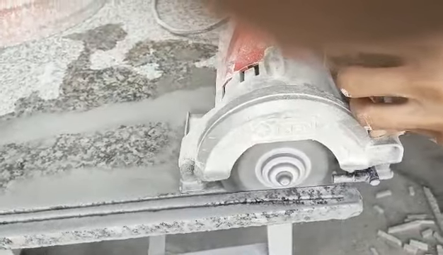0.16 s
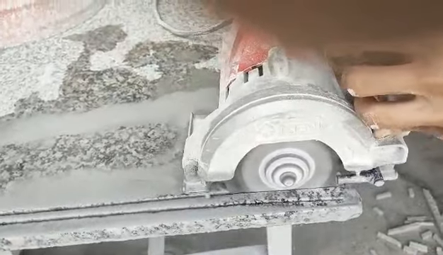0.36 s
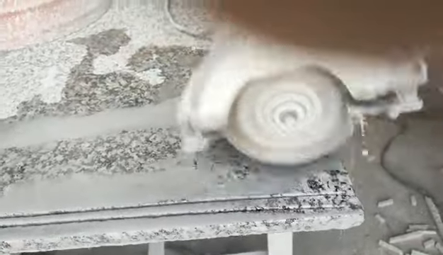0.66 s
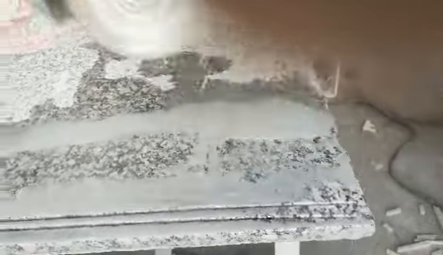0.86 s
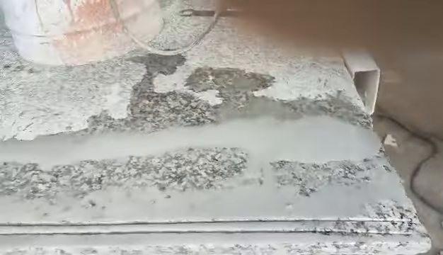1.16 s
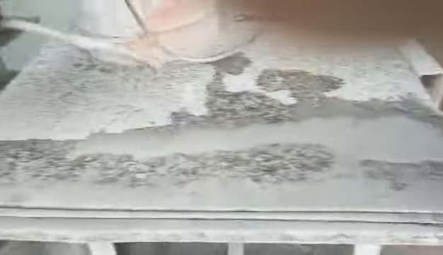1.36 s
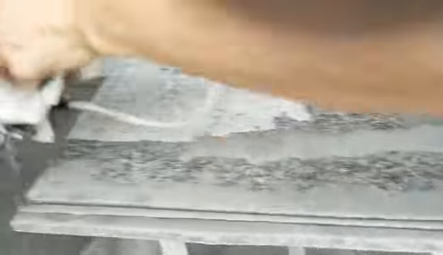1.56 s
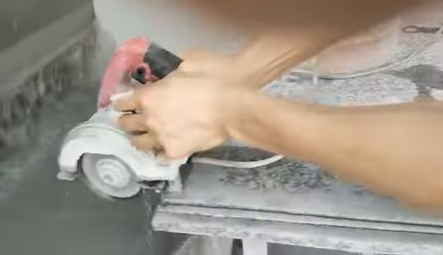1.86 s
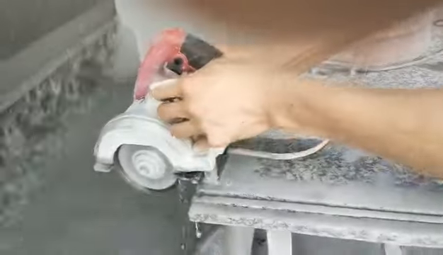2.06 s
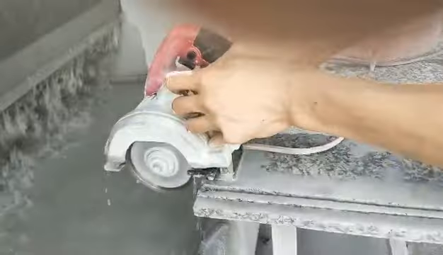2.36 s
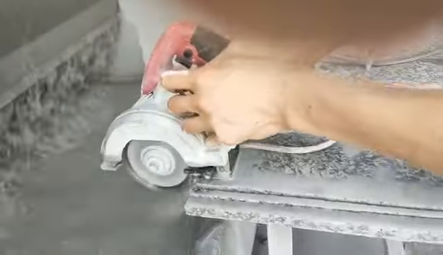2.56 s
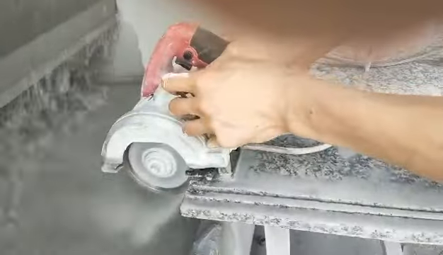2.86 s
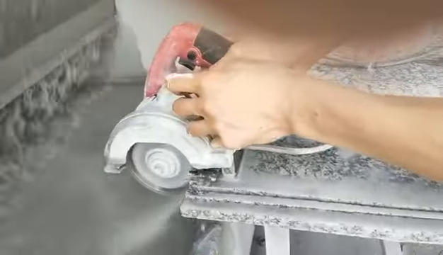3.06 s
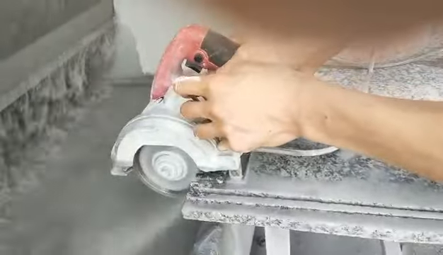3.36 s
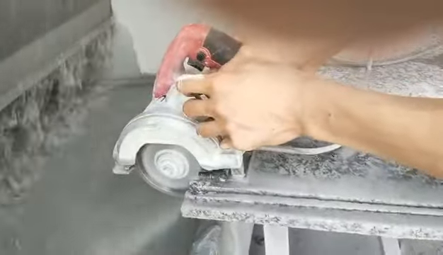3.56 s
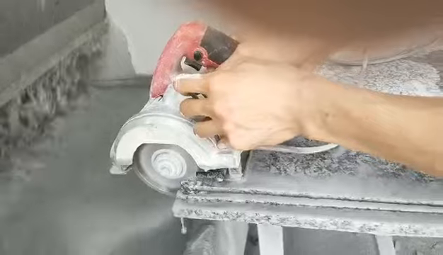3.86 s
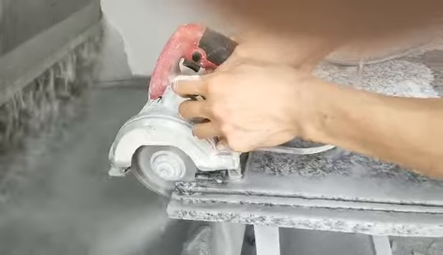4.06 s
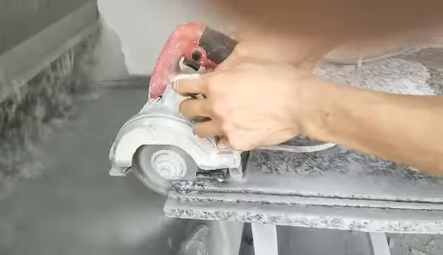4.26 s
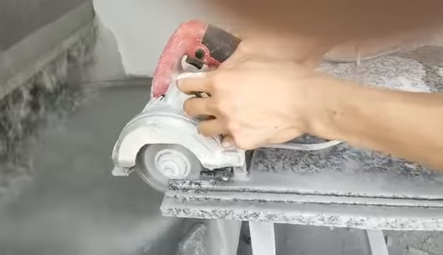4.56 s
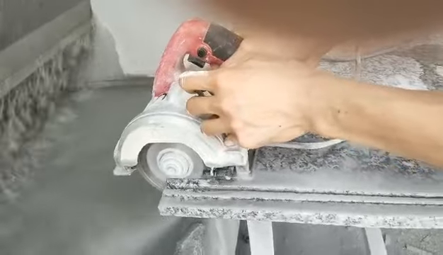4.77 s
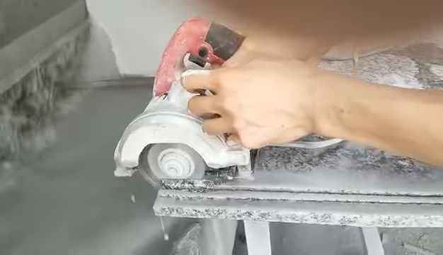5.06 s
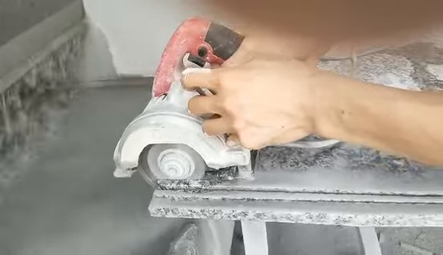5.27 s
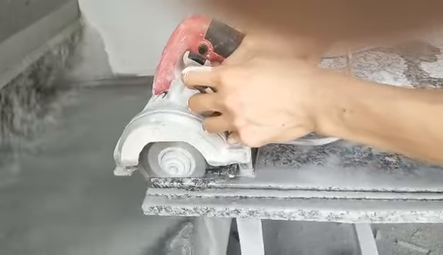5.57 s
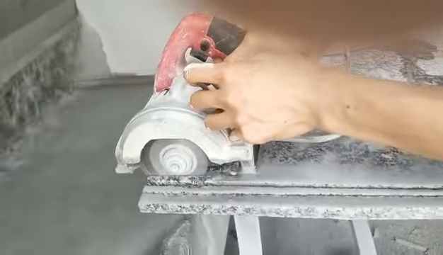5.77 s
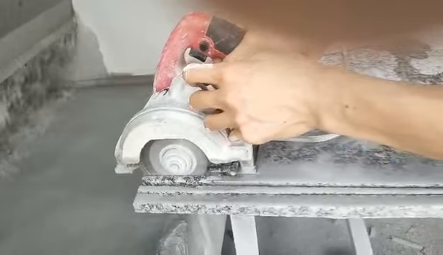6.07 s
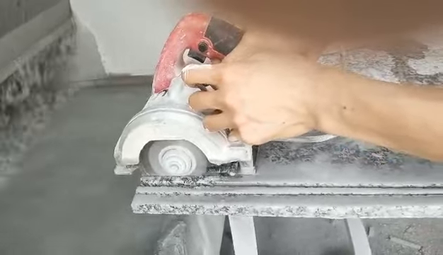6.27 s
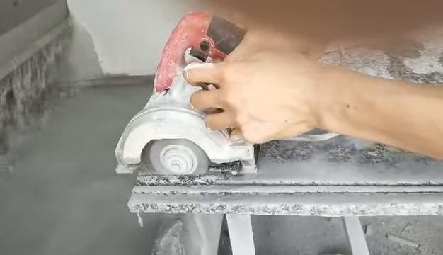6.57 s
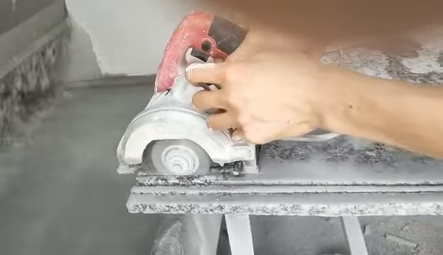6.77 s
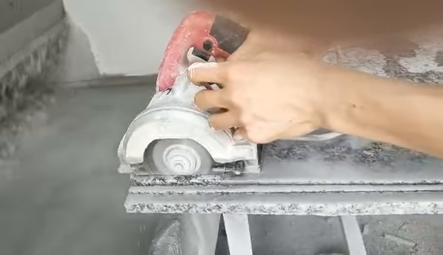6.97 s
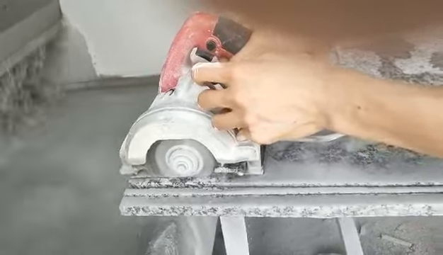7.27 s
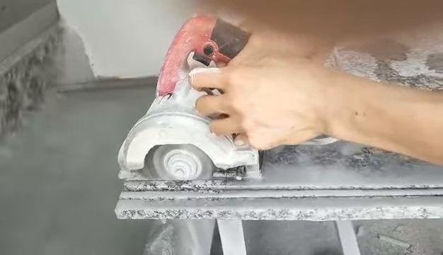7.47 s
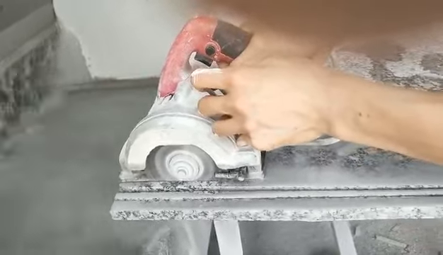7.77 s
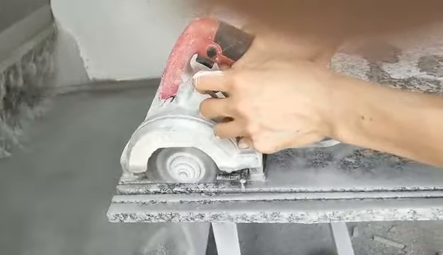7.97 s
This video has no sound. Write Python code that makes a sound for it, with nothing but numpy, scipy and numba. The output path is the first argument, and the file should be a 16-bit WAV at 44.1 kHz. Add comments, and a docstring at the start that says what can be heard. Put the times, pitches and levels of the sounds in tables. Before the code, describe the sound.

Loud gritty stone grinding with rushing slurry breaks off for an airy, whining free spin of the blade, then returns and continues steadily.

```python
"""A handheld electric cutter grinds a groove in wet granite, heard by a phone at an arm's length.
At first the diamond rim scrapes round, partly alike on each turn, and rings the steel disc; slurry rushes out.
At 0.6 s the blade is lifted and races: filtered noise makes its air hiss, a sine its rising whine.
At 2.5 s it bites again and slows, and the grinding and the slurry jet return until the end.
Throughout, the phone's gain control ducks loud grinding and brings up hiss and mains hum in the pause."""
import sys
import numpy as np
from scipy import signal
from scipy.fft import rfft, irfft, next_fast_len
from scipy.io import wavfile
from scipy.ndimage import uniform_filter1d, map_coordinates
from numba import njit

SR = 44100
rng = np.random.default_rng(int(sys.argv[2]) if len(sys.argv) > 2 else 0)


def wav_record(signal):
    """Record a signal, one row per channel, as 16-bit PCM in the file named by sys.argv[1]."""
    frames = np.transpose(np.atleast_2d(signal))
    bounded = np.clip(frames, -1, 1)
    # unit amplitude maps onto the largest positive 16-bit level
    quanta = np.round(bounded * 32767).astype(np.int16)
    wavfile.write(sys.argv[1], SR, quanta)


N = 358533
TIME = np.arange(N) / SR
GRID_HZ = np.linspace(1, SR / 2, 4096)

LOADED_HZ, FREE_HZ = 135, 198  # reference blade speeds in turns per second: cutting and running free
LIFT_S, TOUCH_S = 0.626, 2.464  # when the rim leaves the stone and when it bites again
MAINS_HZ = 99.9  # pitch of the mains hum
# which side hears more of the cut: pitch_hz, left_minus_right_db
CUT_SIDE = [(100, 1), (300, -2), (1200, -3), (2400, -2.5), (3300, 0), (7000, 0.5), (10000, 0.5),
            (13600, -4.5), (14200, 7), (14800, 9.5)]


def undb(db):
    """Turn decibels into gain."""
    return 10 ** (np.asarray(db) / 20)


def unit(x):
    """Scale to an average (rms) strength of 1."""
    return x / np.sqrt(np.mean(x ** 2))


def walk(rate):
    """Wander at random: new levels, rate times a second, are smoothed twice; the spread is near 1."""
    hold = max(int(SR / rate), 2)
    steps = np.repeat(rng.standard_normal(N // hold + 1), hold)
    smooth = uniform_filter1d(uniform_filter1d(steps, hold), hold)
    return 1.37 * smooth[:N]


def swell(centre_s, length_s):
    """A smooth rise and fall in time, reaching one at its centre."""
    return np.exp(-(2 * (TIME - centre_s) / length_s) ** 2)


def noise():
    """Unrelated noise at the two microphone ports."""
    return rng.standard_normal((2, N))


def pan(side_db):
    """Left and right gains for a level difference."""
    return undb(np.array([[.5], [-.5]]) * side_db)


def contour(points):
    """Draw a curve in decibels over all frequencies through (Hz, dB) points."""
    hz, db = np.transpose(points)
    return np.interp(np.log(GRID_HZ), np.log(hz), db)


def resonance(hz, width_hz):
    """A resonance passes one pitch best; its gain has halved half a width away."""
    return 1 / (1 + (2 * (GRID_HZ - hz) / width_hz) ** 2)


def colour(x, gains, stretch=np.ones(N)):
    """Filter each channel by its gains, scaled to rms 1; stretch slides the response up or down in time."""
    hz, s, frames = signal.stft(x, SR, nperseg=2048)
    where = hz[:, None] / np.interp(s, TIME, stretch)
    moving = np.array([np.interp(where, GRID_HZ, g) for g in gains])
    return unit(signal.istft(frames * moving, SR)[1][:, :N])


def thicket(x, depth_db, spacing_hz, life_s):
    """Many close resonances swell and fade as the tool moves, a little differently at each port."""
    hz, s, frames = signal.stft(x, SR, nperseg=2048)
    place = np.meshgrid(hz / spacing_hz, s / life_s, indexing="ij")
    both, left, right = (map_coordinates(rng.standard_normal(size=(600, 200)), place, order=2, mode="mirror")
                         for _ in range(3))
    ripple_db = depth_db * np.tanh(both + np.array([left, right]) / 2)
    return unit(signal.istft(frames * undb(ripple_db), SR)[1][:, :N])


def blade_speed():
    """The blade races when lifted and sags as the hand feeds it in; its spinning mass rounds each change."""
    # speed before rounding: time_s, turns_per_second_hz
    speed_points = [(0, 129), (.3, 134.5), (.62, 157), (1.08, 187), (1.35, 195.5), (1.85, 202),
                    (2.47, 206.8), (2.65, 203.4), (2.85, 186.8), (3.2, 161.8), (3.45, 150.4), (4, 139.4),
                    (4.25, 136.2), (4.45, 136.8), (4.68, 134.4), (5.2, 137.7), (5.5, 133.2), (5.92, 130.2),
                    (6.38, 152.9), (6.6, 142), (6.9, 139.7), (7.3, 128.7), (7.42, 129.4), (7.55, 139.7),
                    (7.75, 132.8), (8.13, 132.1)]
    return uniform_filter1d(np.interp(TIME, *np.transpose(speed_points)), size=2048, mode="nearest")


def on_stone(fade_s, bite_s):
    """One while the rim cuts, dying away after the lift and returning with the next bite."""
    fading = np.exp(-np.maximum(TIME - LIFT_S, 0) / fade_s)
    biting = np.clip((TIME - TOUCH_S) / bite_s, 0, 1)
    return fading + biting


def cut_levels(speed_hz):
    """A light, fast cut grinds louder with less fine grit; jolts briefly upset the balance."""
    # the rim catches or skips: centre_s, length_s, added grinding_db, added jet_db, added grit_db
    jolts = [(.08, 0.8, 2.5, 3, 4), (0.53, 0.043, -3.5, -8.5, -3), (0.594, 0.051, -9, 0, 3),
             (2.52, 0.075, 0, 1.5, 9), (2.577, 0.13, 3.5, -1, 1.5), (6.03, 0.2, 0, 1.5, 2.5),
             (6.517, 0.048, 3.5, 4, 1), (6.733, 0.32, 3.5, 3, 4), (6.913, 0.07, -0.5, -3, -2),
             (7.35, 0.35, 0, 0, 0)]
    light = (speed_hz - LOADED_HZ) / 69  # 1 at 69 turns per second above loaded speed
    grind_db = -17 + 1 * light
    jet_db = -17  # the same for light and deep cuts
    grit_db = -26 - 1 * light
    for centre_s, length_s, more_grind_db, more_jet_db, more_grit_db in jolts:
        jolt = swell(centre_s, length_s)
        grind_db = grind_db + more_grind_db * jolt
        jet_db = jet_db + more_jet_db * jolt
        grit_db = grit_db + more_grit_db * jolt
    return grind_db, jet_db, grit_db


def grinding(speed_hz, turns, grind_db, grit_db):
    """Repeating and fresh scraping drive the disc's modes, which stiffen as it spins faster."""
    # the disc's modes at loaded speed: pitch_hz, width_hz, relative level_db, left_minus_right_db
    disc_modes = [(3430, 200, -3, 6), (3840, 92, -1.5, 9), (4150, 290, -1.5, 4.5), (4740, 160, -4, 10),
                  (4960, 130, -5.5, 3), (5210, 125, 3, -2.5), (5610, 350, -4, -4), (6040, 90, -9, 3),
                  (6300, 110, -1, 12.5), (6570, 90, -6, 12), (6830, 170, -4.5, -1), (7840, 160, -2, -1.5),
                  (9096, 122, -7, -7), (12300, 460, -11, 1)]
    # broad colour of the scraping: pitch_hz, relative level_db
    scrape_colour = [(30, -45), (300, -23), (1200, -20), (2200, -8.5), (3000, -2.5), (3700, -3), (4500, -5),
                     (5400, -6.5), (5950, -6), (6900, -13.5), (7300, -25), (8500, -28), (10000, -40),
                     (16000, -43)]
    # colour of the finest grit: pitch_hz, relative level_db
    grit_colour = [(8700, -12), (9600, -2.5), (10300, 1.5), (10900, 6), (11500, 3), (11900, -1), (12500, 0),
                   (13300, 0), (14200, -3), (14900, 1.5), (15400, -7), (15900, -8)]
    # how alike the two channels are at each pitch, first cut: pitch_hz, likeness (cut off near -1 and 1)
    first_likeness = [(3500, 0.17), (4200, 0.0074), (4700, -0.0062), (5200, -0.53), (6000, -0.31),
                      (6600, -0.94), (7400, -1.1), (7900, -0.81), (8400, -1.1), (9100, 0.59), (10000, 0.63),
                      (12000, -0.055)]
    # how alike the two channels are at each pitch, second cut: pitch_hz, likeness (cut off near -1 and 1)
    second_likeness = [(3000, 0.083), (4100, -0.035), (4550, -0.27), (5250, 0.4), (5900, -0.58),
                       (6450, 0.28), (7200, -0.85), (7850, -0.32), (8450, -0.65), (9100, 0.51),
                       (9700, 0.052), (10800, -.3), (12400, .2), (14200, -0.36), (15500, 0.074)]

    share = repeating_share(speed_hz)
    # crystals snatch at the rim and make its speed flutter
    flutter_hz = 0.4 * walk(45)
    repeating = rim(turns + np.cumsum(flutter_hz) / SR, memory=0.97)
    force = np.sqrt(share) * repeating + np.sqrt(1 - share) * noise()
    # the disc runs slightly out of true, so a grazing cut is pressed once a turn
    force = force * (1 + 0.26 * share ** 4 * np.cos(2 * np.pi * turns))
    first_cut, second_cut = alike(force, first_likeness), alike(force, second_likeness)
    force = np.where(TIME < (LIFT_S + TOUCH_S) / 2, first_cut, second_cut)
    # the disc's many close resonances swell and fade as it shifts in the groove
    scraping = thicket(force, depth_db=7, spacing_hz=65, life_s=.06)

    side_gains = pan(contour(CUT_SIDE))
    power = (undb(contour(scrape_colour)) * side_gains) ** 2
    for hz, width_hz, db, side_db in disc_modes:
        power = power + (undb(db) * pan(side_db) * resonance(hz, width_hz)) ** 2
    stiffening = 1 + 0.083 * (speed_hz / LOADED_HZ - 1) + 0.0036 * walk(4.04)
    # hard and soft crystals in the granite make the bite uneven
    disc = colour(scraping, np.sqrt(power), stiffening) * undb(grind_db + 0.5 * walk(20) + 0.29 * walk(6.7))
    grit = colour(scraping, undb(contour(grit_colour)) * side_gains) * undb(grit_db + 1.0 * walk(20))
    return disc + grit + edge_rings(scraping, fade_s=0.2)


def repeating_share(speed_hz):
    """A grazing cut scrapes much the same way on every turn; a deep one repeats less."""
    # the disc rubs the groove's wall and sings: centre_s, length_s, added repeating share
    rubs = [(.1, 0.37, .25), (.54, .25, 0.31), (3.8, 0.85, 0.22), (4.85, 0.6, 0.17), (7.33, 0.39, 0.25)]
    deep, grazing = 0.21, 0.71  # repeating shares, 0 to 1
    # fully grazing from 68 turns per second above loaded speed
    how_grazing = np.clip((speed_hz - LOADED_HZ) / 68, 0, 1)
    rubbing = sum(more * swell(centre_s, length_s) for centre_s, length_s, more in rubs)
    return np.clip(deep + (grazing - deep) * how_grazing + rubbing, 0, 1)


def rim(turns, memory, size=256):
    """The diamonds meet the stone again each turn: even partials whose pattern slowly wears away."""
    fresh = rng.standard_normal((2, int(turns[-1]) + 2, size))
    # each turn keeps most of the pattern of the one before
    worn = rfft(signal.lfilter([1], [1, -min(memory, .98)], fresh, axis=1))
    even = irfft(worn / np.abs(worn), size)
    return unit(np.array([map_coordinates(side.ravel(), [turns * size], order=3) for side in even]))


def alike(x, points):
    """Make two channels move together or against each other, frequency by frequency."""
    hz, likeness = np.transpose(points)
    share = np.interp(np.fft.rfftfreq(N, 1 / SR), hz, np.clip(likeness, -.98, .98))
    mid, side = irfft(rfft(x) * np.sqrt([1 + share, 1 - share]), N)
    return unit(np.array([mid + side, mid - side]))


def edge_rings(force, fade_s):
    """The scraping force makes resonances flare at set times as the rim works on the stone."""
    # flares: start_s, end_s, pitch_hz, width_hz, level_db, left_minus_right_db
    flares = [(-.1, 0.79, 4750, 1100, -26.5, -5), (0.297, 0.8, 4400, 1100, -24.5, -1),
              (0.38, .75, 4750, 60, -27, -3), (0.42, .8, 4090, 130, -28, 3),
              (0.45, 0.65, 6160, 450, -27, -6), (-.1, 0.65, 9200, 120, -36, -9),
              (2.3, 2.8, 4000, 550, -24, 3), (2.3, 3, 6480, 130, -33, 6), (2.3, 3.1, 9550, 130, -39, -5),
              (2.5, 3.8, 3580, 110, -34, 9), (3.05, 4.4, 1403, 70, -35, 3), (2.7, 3.9, 5250, 600, -31.5, 3),
              (3.6, 5.3, 4360, 320, -36.5, 11), (4.4, 4.9, 4715, 79, -39, 12),
              (7, 7.8, 3700, 620, -34.5, 9)]
    out, size = 0, next_fast_len(N)
    spectrum, bins_hz = rfft(force, size), np.fft.rfftfreq(size, 1 / SR)
    for start_s, end_s, hz, width_hz, db, side_db in flares:
        gain = np.interp(bins_hz, GRID_HZ, resonance(hz, width_hz))
        ring = irfft(spectrum * gain, size)[:, :N]
        held = np.clip(np.minimum(TIME - start_s, end_s - TIME) / fade_s, 0, 1)
        out = out + unit(ring) * held * undb(db) * pan(side_db)
    return out


def slurry_jet(jet_db):
    """Water and stone dust rush out as unsteady noise; the ports share a little of its lows."""
    # colour of the jet: pitch_hz, relative level_db
    jet_colour = [(10, -50), (25, -33), (50, -16), (80, -8), (120, -2.5), (170, 1), (300, -.5), (600, -2),
                  (1200, -3), (1800, -7), (2600, -8), (4500, -14.5), (7500, -52)]
    gains = undb(contour(jet_colour)) * pan(contour(CUT_SIDE))
    common = np.clip(0.17 / (1 + (GRID_HZ / 450) ** 2), 0, 1)
    apart = colour(noise(), gains * np.sqrt(1 - common))
    shared = colour(noise()[[0, 0]], gains * np.sqrt(common))
    return (apart + undb(-13.5) * shared) * undb(jet_db + 0.54 * walk(20))


def fan_and_whine(speed_hz, turns):
    """The fan and blade air hisses and rings the guard; the motor whines in step with its turning."""
    return fan_air(speed_hz / FREE_HZ) + commutator_whine(turns)


def fan_air(speed):
    """Air noise from fan and blade grows and rises in pitch with speed, roughened by the mains."""
    # colour of the air at free speed: pitch_hz, relative level_db
    air_colour = [(300, -18), (700, -2.5), (1000, -3.5), (1270, 2), (1750, -1), (2200, 2.5), (2500, 1.5),
                  (3000, 0), (3700, 2), (4750, 0), (5900, 0), (7200, -0.5), (8100, 0), (9100, -9.5),
                  (9900, -7.5), (11500, -13), (15500, -20.5)]
    # which side hears more air: pitch_hz, left_minus_right_db
    air_side = [(600, -0.5), (1300, -3.5), (2300, -5), (3200, -1), (6500, -0.5), (7400, 0), (8200, -5),
                (9500, -5.5), (11500, -3.5), (15000, 0)]
    # guard resonances at free speed: pitch_hz, width_hz, relative level_db, left_minus_right_db
    guard_modes = [(2330, 290, -36.5, -3), (2700, 260, -39, -4), (7900, 350, -37.5, -4)]
    # the guard's open side swings past the phone:
    # centre_s, length_s, pitch_hz at free speed, width_hz at free speed, level_db, left_minus_right_db
    guard_rush = (1.06, 1, 6300, 1400, -28, 3)

    gains = undb(contour(air_colour)) * pan(contour(air_side))
    air = colour(from_the_right(below_hz=1900), gains, speed ** 0.44)
    air = thicket(hollow(air), depth_db=3.5, spacing_hz=109.6, life_s=.07) * undb(-24.0)
    rings = sum(undb(db) * pan(side_db) * resonance(hz, width_hz) for hz, width_hz, db, side_db in guard_modes)
    ringing_guard = colour(noise(), rings, speed ** 0.63) * undb(-33.5 + 2 * walk(14))
    air = (air + ringing_guard) * speed * undb(0.63 * walk(21.57))
    centre_s, length_s, hz, width_hz, db, side_db = guard_rush
    rush = colour(noise(), resonance(hz, width_hz) * pan(side_db), speed ** 0.27)
    air = air + rush * undb(db) * swell(centre_s, length_s)
    return air * (1 + 0.07 * np.cos(2 * np.pi * MAINS_HZ * TIME))


def commutator_whine(turns):
    """The commutator gives about 71 cycles a turn, with an unsteady pitch and level."""
    # level before its wavering, as the free-running tool is swung about: time_s, level_db
    whine_levels = [(.6, -72), (1, -57), (1.1, -43), (1.35, -48), (1.6, -43), (1.85, -40), (1.95, -50),
                    (2.03, -44), (2.15, -57), (2.3, -44), (2.47, -52), (2.8, -72)]
    cycles = 70.9 * turns + np.cumsum(60 * walk(300)) / SR
    whine_db = np.interp(TIME, *np.transpose(whine_levels))
    waver_db = 3.2 * np.array([walk(20), walk(24)])
    return np.sqrt(2) * np.sin(2 * np.pi * cycles) * undb(whine_db + waver_db)


def from_the_right(below_hz):
    """Noise whose lows reach the right port first and the left a moment later; its treble is diffuse."""
    direct_share, lag_s = 0.77, 0.29 / 1000
    hz = np.fft.rfftfreq(N, 1 / SR)
    share = np.clip(direct_share / (1 + (hz / below_hz) ** 2), 0, 1)
    direct = rfft(noise()[0]) * np.exp(-2j * np.pi * hz * np.array([[lag_s], [0]]))
    return irfft(np.sqrt(share) * direct + np.sqrt(1 - share) * rfft(noise()), N)


def hollow(x):
    """The slab's reflection weakens one band of the hiss; the dip moves as the tool is carried over it."""
    # middle of the weakened band: time_s, pitch_hz
    dip_path = [(.7, 4400), (1.15, 5130), (1.55, 5000), (1.83, 4000), (2.05, 4000), (2.2, 4650),
                (2.45, 4100)]
    dip_hz = np.interp(TIME, *np.transpose(dip_path))
    gain = 1 - 0.56 * resonance(dip_hz.mean(), width_hz=900)
    return colour(x, [gain, gain], dip_hz / dip_hz.mean())


def housing(speed_hz):
    """The body hums with the mains and shakes; a wavering buzz builds as the blade nears free speed."""
    # colour of the shaking: pitch_hz, relative level_db
    shake_colour = [(10, -52), (25, -40), (60, -19), (90, -6), (125, -5.5), (160, -0.5), (235, -7),
                    (290, -3), (380, -4.5), (520, -5), (800, -10), (1300, -11.5), (3000, -65)]
    # buzz at free speed: pitch_hz, level_db, rate of wavering_hz
    buzz_tones = [(198.5, -40.5, 18), (263.6, -40.5, 28), (303.3, -41, 28), (468, -45.5, 22),
                  (562, -55, 20)]
    # faint tone after the lift: centre_s, length_s, pitch_hz, level_db
    lift_tone = (1.1, .5, 623, -44)

    speed = speed_hz / FREE_HZ
    shake = colour(from_the_right(below_hz=1800), undb(contour(shake_colour)) * pan(-.3)) * undb(-30.5)
    hum_cycles = np.cumsum(MAINS_HZ + 0.31 * walk(30)) / SR
    hum = np.sqrt(2) * undb(-36.5 + 0.6 * walk(22)) * np.sin(2 * np.pi * hum_cycles)
    buzz = 0
    for hz, db, waver_hz in buzz_tones:
        waver = walk(waver_hz) + 1j * walk(waver_hz)
        buzz = buzz + undb(db) * np.real(waver * np.exp(2j * np.pi * hz * TIME))
    centre_s, length_s, hz, db = lift_tone
    tone_cycles = np.cumsum(hz + 3 * walk(20.2)) / SR
    tone = np.sqrt(2) * undb(db) * swell(centre_s, length_s) * np.sin(2 * np.pi * tone_cycles)
    return (shake + hum) * speed ** 2 + buzz * speed ** 2.5 + tone


def surroundings(x):
    """Early echoes whose paths sway with the hands; each port gets its own."""
    # slab, trough and wall: typical extra delay_ms, level_db, typical sway_ms
    surfaces = [(1.3, -16, 0.091), (3.6, -11.5, 0.095), (9.5, -12.5, 0.197)]
    out = x.copy()
    for delay_ms, db, sway_ms in surfaces:
        for side in range(2):
            lag = (delay_ms * rng.uniform(.85, 1.15) + sway_ms * walk(1.5)) * SR / 1000
            out[side] += undb(db) * np.interp(np.arange(N) - lag, np.arange(N), x[side], left=0)
    return out


def scene():
    """The motor runs throughout; the cutting sounds only while the rim is on the stone."""
    speed_hz = blade_speed()
    turns = np.cumsum(speed_hz) / SR
    grind_db, jet_db, grit_db = cut_levels(speed_hz)
    contact = on_stone(fade_s=0.0044, bite_s=0.069)
    ringing = on_stone(fade_s=0.027, bite_s=0.041)
    pressed = on_stone(fade_s=0.012, bite_s=0.15)
    cut = ringing * grinding(speed_hz, turns, grind_db, grit_db)
    # the groove shields the blade's air noise
    air_and_whine = fan_and_whine(speed_hz, turns) * undb(-7 * contact)
    jet = contact * slurry_jet(jet_db)
    # pressed on the slab, the housing is held still and sounds weaker
    body = housing(speed_hz) * undb(-7 * pressed)
    return surroundings(cut + air_and_whine) + jet + body


@njit
def follow(size, attack, release):
    """Follow the level, rising quickly and falling slowly."""
    out, level = np.empty(len(size)), size[:2000].mean()
    for i in range(len(size)):
        level += (size[i] - level) * (attack if size[i] > level else release)
        out[i] = level
    return out


def gain_control(x, target_db, attack_s, release_s, strength):
    """Turn both channels up or down together towards one steady level."""
    size = np.sqrt(uniform_filter1d(np.mean(x ** 2, axis=0), size=256) + 1e-12)
    level = follow(size, 1 / (attack_s * SR), 1 / (release_s * SR))
    return x * (undb(target_db) / level) ** min(strength, 1)


def record(dry):
    """The phone evens out the level and cuts everything above its top frequency."""
    levelled = gain_control(dry, target_db=-12.5, attack_s=0.0026, release_s=0.059, strength=1.0)
    top_hz = 15750
    return signal.sosfilt(signal.ellip(12, .1, 80, top_hz, fs=SR, output="sos"), levelled)


dry = scene()
out = record(dry)
wav_record(out)
```